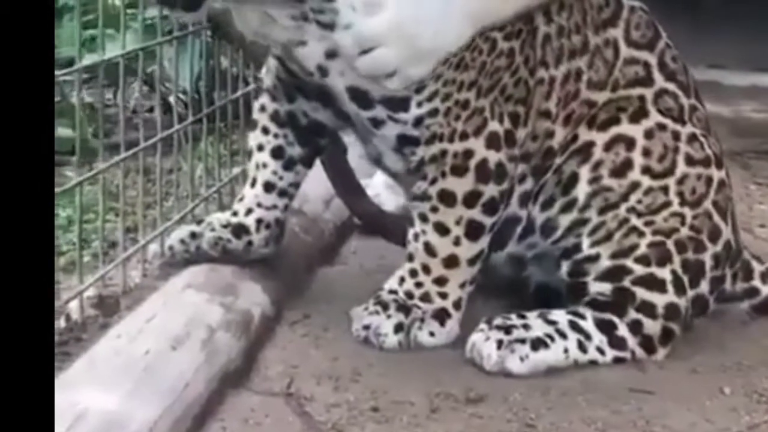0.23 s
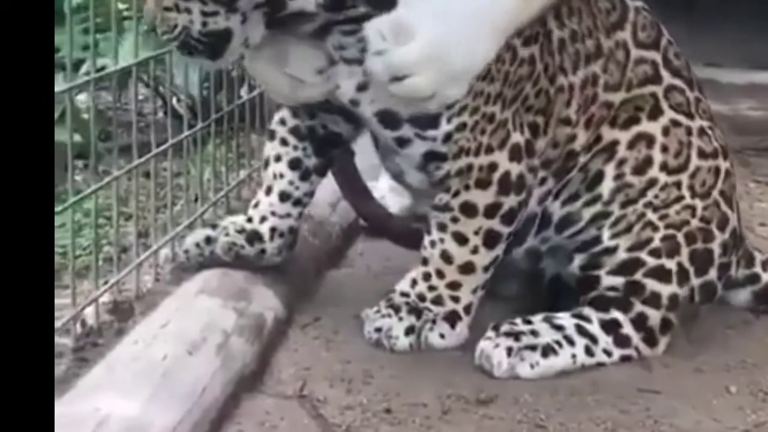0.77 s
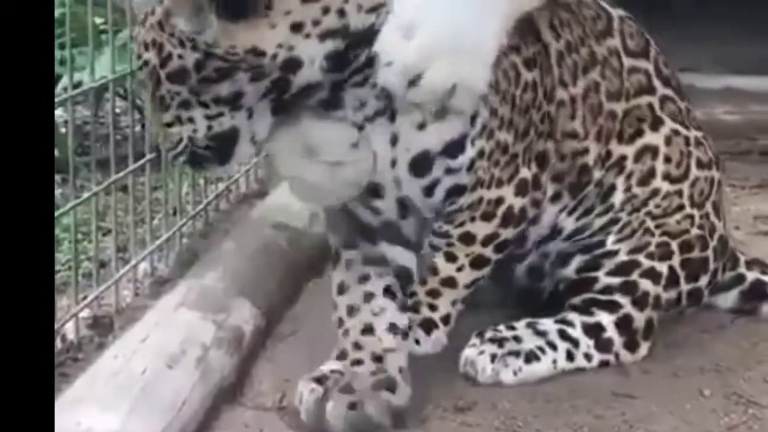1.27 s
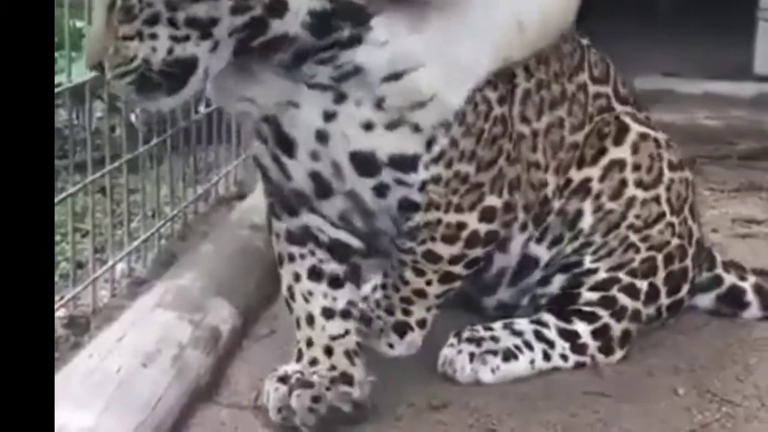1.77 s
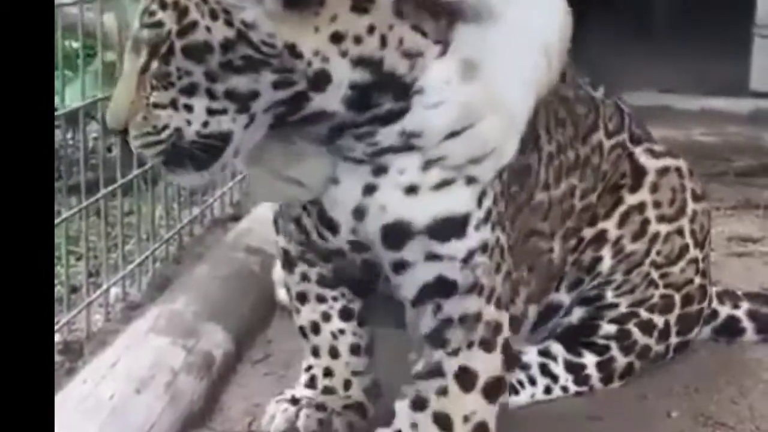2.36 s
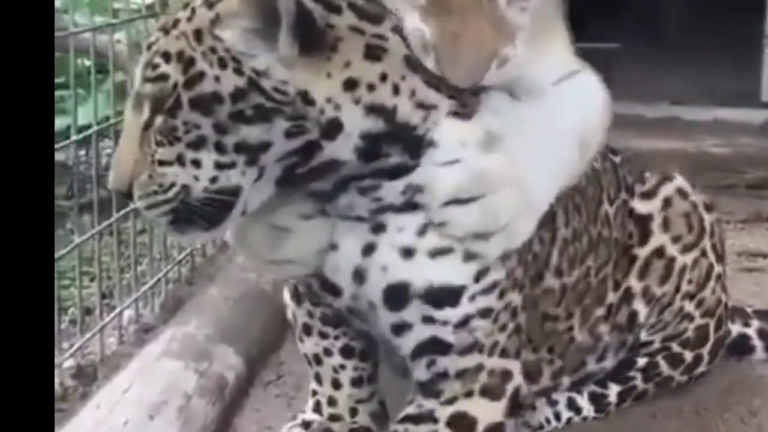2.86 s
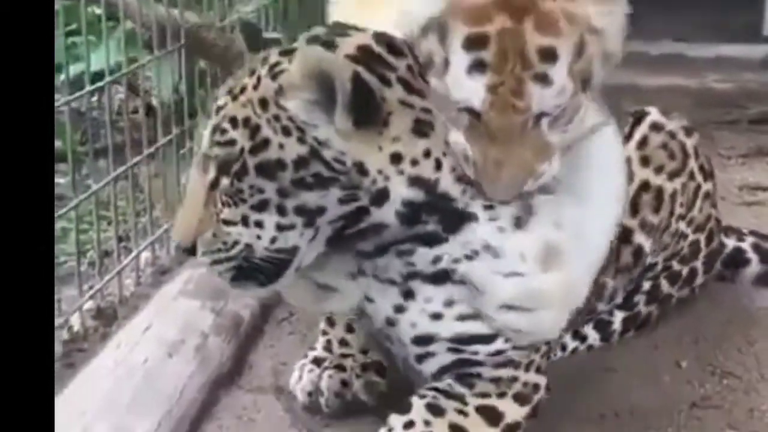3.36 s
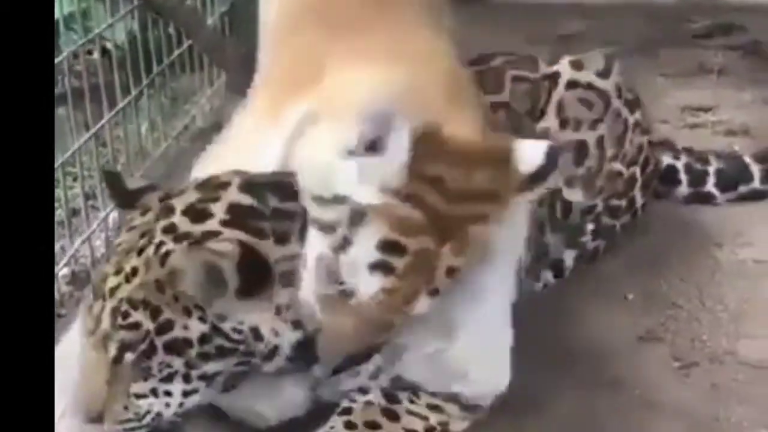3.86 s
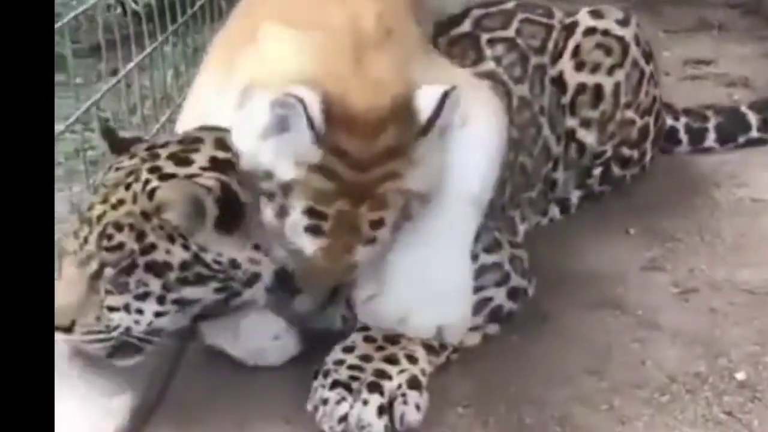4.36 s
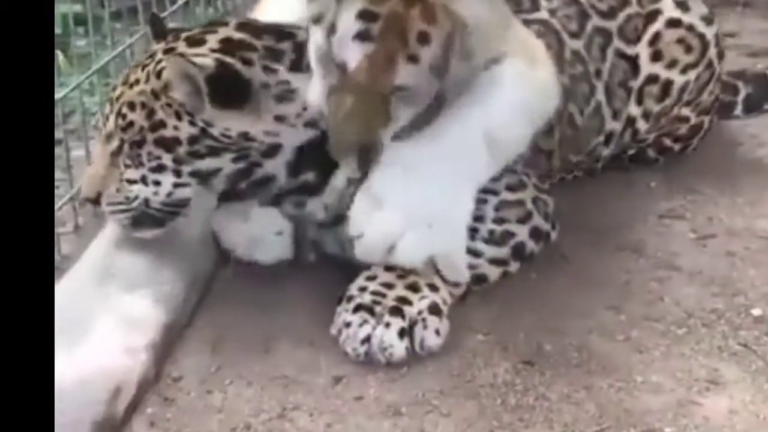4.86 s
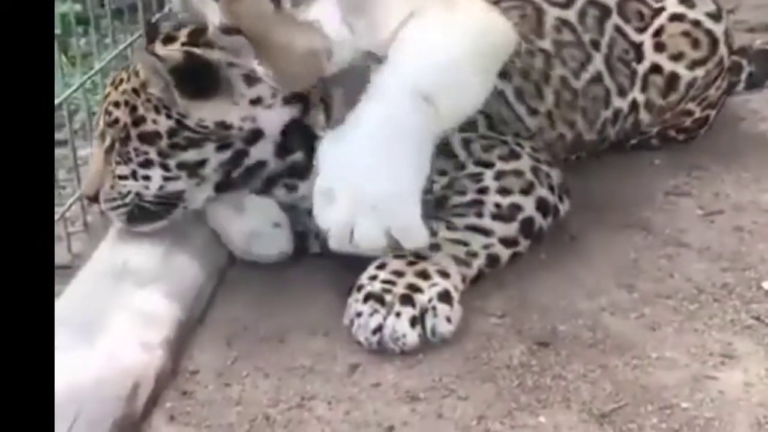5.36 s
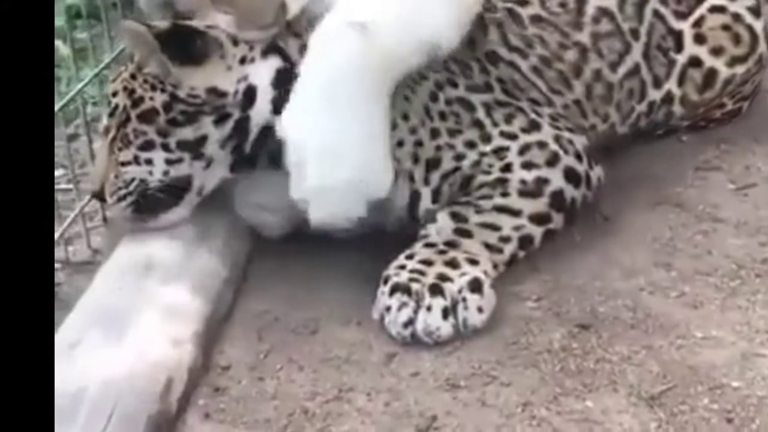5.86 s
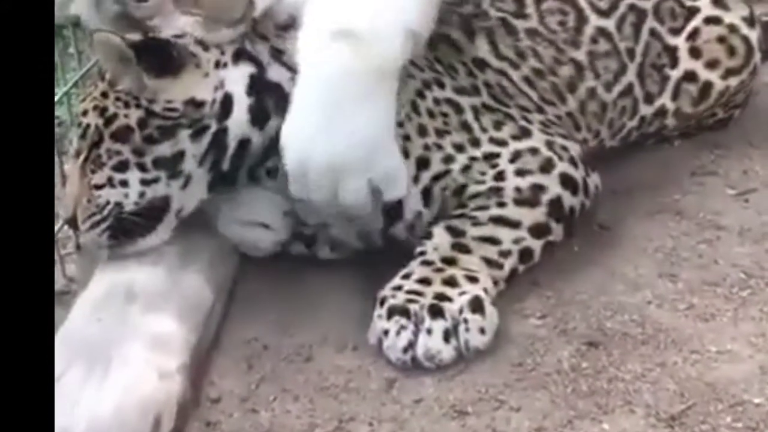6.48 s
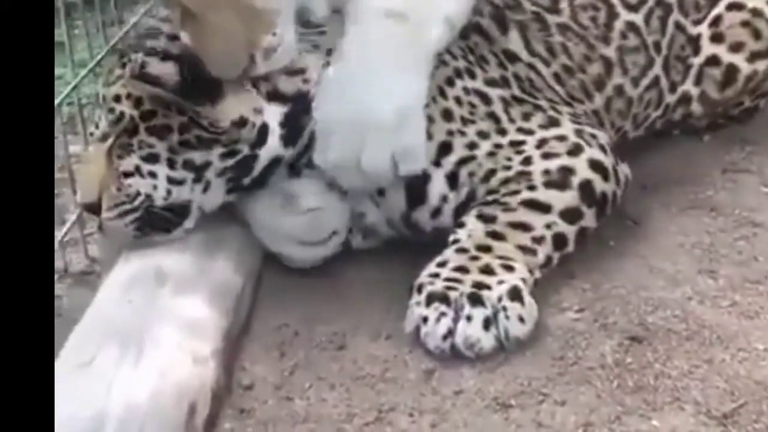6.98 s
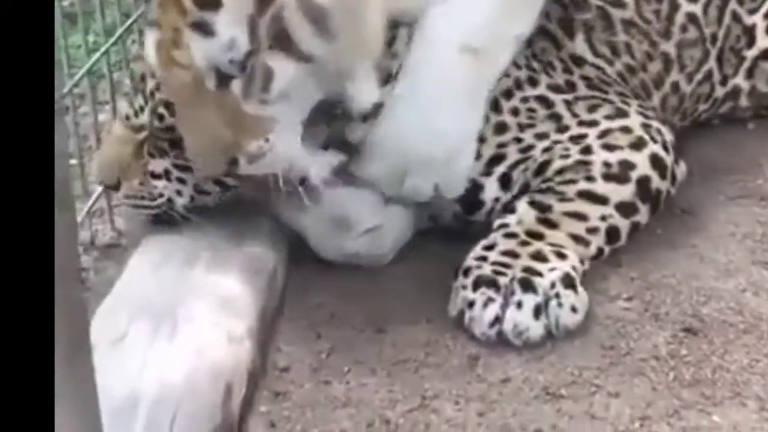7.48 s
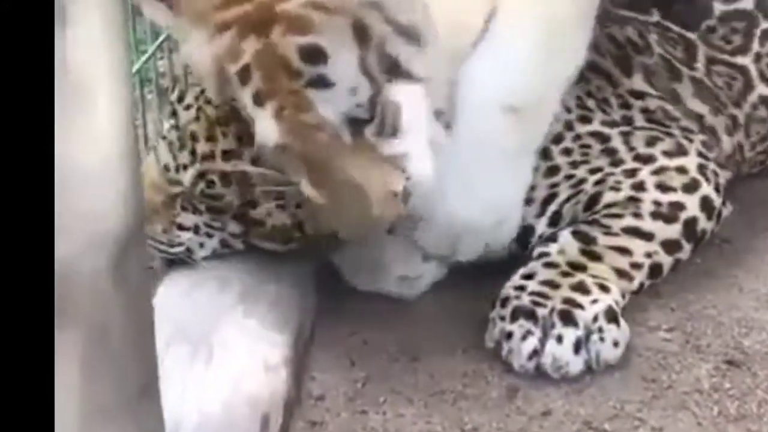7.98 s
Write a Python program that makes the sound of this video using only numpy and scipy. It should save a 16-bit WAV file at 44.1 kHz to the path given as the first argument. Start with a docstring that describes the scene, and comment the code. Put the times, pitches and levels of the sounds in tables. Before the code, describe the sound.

A big cat gives a harsh open-mouthed snarl that sputters out, then grunts, rumbles and growls long and rattling, over faint birds and hum.

```python
"""Far birds chirp, a machine hums and outdoor air hisses throughout, while two big cats wrestle in a concrete pen.
One gives a harsh open-mouthed snarl that sputters out in pops over a hiss of spent air. Paws then scuff the
gritty floor, and a grunt sinks to a closed-mouth rumble that opens into a long rattling growl over a faint rustle.
Voices are uneven beats of slack folds, with thumps and turbulent puffs, ringing in a changing throat; birds are
falling sine whistles, hum is sines, air, grit and rustle are shaped noise, and the pen adds dense echoes."""
import sys
import numpy as np
from scipy import signal
from scipy.fft import rfft, irfft
from scipy.io import wavfile

SR = 44100
rng = np.random.default_rng(int(sys.argv[2]) if len(sys.argv) > 2 else 0)


def digitize_waveform(pressure):
    """Quantize a signal to 16-bit integers and store it at the path in sys.argv[1].

    Rows of a 2-D input are taken as channels; values are limited to [-1, 1].
    """
    field = np.atleast_2d(pressure).T
    bounded = np.clip(field, -1, 1)
    quanta = np.round(bounded * 32767).astype(np.int16)
    wavfile.write(sys.argv[1], SR, quanta)


N = 362502
TIME = np.arange(N) / SR

# Separate pops as the snarl gives out. Each row: start in seconds, level in dB before the balance of the ranges.
POPS = [(2.15, -20.5), (2.162, -21.5), (2.188, -25.5), (2.221, -26.5), (2.258, -30.5), (2.278, -29),
        (2.315, -29.5), (2.349, -28), (2.398, -30), (2.448, -27.5), (2.486, -28), (2.54, -29), (2.58, -33),
        (2.634, -44)]
# Usual upper edges of the chest, throat and mouth ranges; teeth lie above. Three values in Hz.
CROSSOVERS_HZ = (470, 1150, 3000)


def cat():
    """Snarl, sputter with its exhaled hiss, grunt, rumble and long growl, all from one kind of voice."""
    out = sputter()
    for utterance in (snarl, exhale, grunt, rumble, growl):
        add(out, *utterance())
    return out


def snarl(focus_width_hz=110, unfocused=0.29, whistle_db=0.0, whistle_width_hz=260):
    """A quick swell and a hard push that settles to a hold; the resonances of mouth and teeth slide."""
    # Throat resonances. Each row: pitch in Hz, width in Hz, relative dB at the start, relative dB at the end.
    modes = [(113, 15, -3, -7), (171, 30, 2.5, 8), (312.6, 40, 1.5, 7), (334, 57, 4, -21),
             (687, 60, 7.5, 6.5), (1025, 59, 10, -3.5), (1268, 92, 3.5, -10.5), (1530, 720, -21.5, -18.5),
             (2802, 126, -16, -29.5), (3650, 420, -27, -28), (4130, 300, -24.5, -30),
             (4810, 80, -21.5, -29), (5610, 390, -29, -28.5), (7530, 1330, -34, -36),
             (8610, 250, -33.5, -29.5), (10160, 560, -45.5, -45)]
    # Uneven level of three ranges. Each row: time in seconds, throat, mouth and teeth in dB before smoothing.
    range_levels = [(0.62, -27, -36, -29), (0.636, -27.5, -25.5, -31), (0.702, -22.5, -29, -30),
                    (0.75, -25.5, -30, -29.5), (0.85, -27, -31, -30.5), (0.96, -29, -29, -33),
                    (1.034, -34, -28.5, -38.5), (1.118, -29, -28, -35.5), (1.238, -44.5, -25, -36),
                    (1.338, -29.5, -22, -34), (1.4, -32, -32, -42.5), (1.408, -33, -23, -29),
                    (1.458, -20, -26.5, -42), (1.47, -49, -31, -39), (1.512, -27, -22.5, -31.5),
                    (1.586, -34, -26.5, -41.5), (1.656, -31, -14.5, -30.5), (1.664, -46, -34, -46),
                    (1.706, -35, -25, -32.5), (1.744, -25.5, -27, -38), (2.104, -24.5, -31.5, -35.5),
                    (2.11, -21.5, -36, -36)]
    # The working jaw slides the main mouth resonance. Each row: time in seconds, pitch in Hz.
    mouth_curve = [(0.62, 1060), (0.796, 1142), (0.888, 1060), (0.936, 1240), (1.164, 1050), (1.248, 1250),
                   (1.298, 1134), (1.58, 1061), (1.602, 1150), (1.872, 1140), (1.926, 1030), (1.982, 1240),
                   (2.078, 1230), (2.135, 1060)]
    # Air whistles past the teeth, shifting with the lips. Each row: time in seconds, pitch in Hz.
    whistle_curve = [(0.62, 2880), (0.7, 2960), (0.755, 4900), (0.8, 4330), (0.828, 3050), (0.86, 3050),
                     (0.905, 4300), (0.945, 2760), (1.01, 4100), (1.28, 4130), (1.45, 4750), (1.62, 4760),
                     (1.85, 5450), (2.135, 3860)]
    # Upper edges of the chest, throat and mouth ranges. Three values in Hz.
    snarl_crossovers_hz = (470, 880, 1700)
    start_s, end_s = 0.6, 2.138
    held_db, push_db, push_s = -21.5, 3.5, 0.22  # held effort; extra push and the time in which it is spent
    swell_from_db, swell_s = -13.5, 0.028

    age = np.arange(0, end_s - start_s, 1 / SR)
    t = start_s + age
    swell_db = swell_from_db * np.maximum(1 - age / swell_s, 0)
    effort_db = held_db + push_db * np.exp(-age / push_s) + swell_db
    slaps, gains = flap(t, effort_db, rate_per_push=270, jitter=0.1385, force_db=0.3, colour_db=1.0)
    breath = np.interp(age, [0, age[-1]], [0.62, 0.17])
    drives = gains * excite(slaps, rough=0.4, breath=breath, burst_s=0.0024, tail=0.29, snap=0.42,
                            first_thump=0.064, mid_thump=0.072, dull_puff=0.14)
    chest, gullet, mouth, teeth = ring(drives, modes, leak_db=-3.5, jaw_start=1.011, jaw_end=0.99,
                                       waver_db=4.0, wander=0.018, crossovers=snarl_crossovers_hz)

    mouth_hz = np.interp(t, *np.transpose(mouth_curve))
    mouth = unfocused * mouth + resonate(mouth, mouth_hz, focus_width_hz)
    whistle_hz = np.interp(t, *np.transpose(whistle_curve))
    teeth = teeth + amp(whistle_db) * resonate(teeth, whistle_hz, whistle_width_hz)

    s, *levels_db = np.transpose(range_levels)
    smoothed_db = [smooth(np.interp(TIME, s, db), .05) for db in levels_db]
    upper_db = [np.interp(t, TIME, db) + swell_db for db in smoothed_db]
    return utter(t, [chest, gullet, mouth, teeth], [effort_db] + upper_db)


def sputter(chest_db=-2.0, throat_db=-2, mouth_db=-11.0, hiss_db=-28):
    """The last air of the snarl escapes in separate pops, each duller than the one before."""
    # Throat resonances. Each row: pitch in Hz, width in Hz, relative dB at the first pop, relative dB at the last.
    modes = [(185, 47, -2.5, 8), (346, 65, -10, 4.5), (673, 52, 0, 4), (820, 110, -5.5, -6),
             (1060, 62, -12, -4), (1446, 110, -34, -19), (1980, 137, -34, -25.5), (2590, 100, -31, -31),
             (3020, 220, -35.5, -27.5), (3550, 63, -25, -27), (4930, 530, -34, -40),
             (8850, 1700, -40.5, -41), (9850, 390, -42, -49)]
    first_bright_db, dull_s = 5, 0.11  # extra brightness of the first pop, and its fading time as the mouth closes
    out = np.zeros(N)
    slap = np.zeros(SR // 8)
    slap[SR // 50] = 1  # one beat, with room ahead of it for the parting of the folds
    first_s, last_s = POPS[0][0], POPS[-1][0]
    for s, db in POPS:
        progress = (s - first_s) / (last_s - first_s)
        bright_db = first_bright_db * np.exp((first_s - s) / dull_s)
        drives = excite(slap, rough=0.28, breath=0, burst_s=0.0031, tail=0.077, snap=0.34,
                        first_thump=0.25, mid_thump=0.18, dull_puff=0.56)
        posture = throat(modes, leak_db=-17.0, progress=progress)
        parts = signal.fftconvolve(drives, posture, axes=1)
        parts = parts / np.linalg.norm(parts, axis=1)[:, None] * np.sqrt(SR / 30)  # equal energy in each range
        balance_db = [chest_db - bright_db, throat_db, mouth_db + bright_db, hiss_db + bright_db]
        add(out, s - .021, amp(db + np.array(balance_db)) @ parts)
    return out


def exhale(first_db=-50, last_db=-57):
    """Spent air hisses past the teeth as fading shaped noise for as long as the sputter lasts."""
    # Colour of the hiss. Each row: pitch in Hz, relative level in dB per Hz.
    colour = [(300, -14), (1200, 3), (1800, -12), (2900, -7), (3300, -10), (3570, 7), (3850, -6),
              (4900, -6), (6300, -22), (8200, -20), (15000, -36)]
    t = np.arange(POPS[0][0], POPS[-1][0], 1 / SR)
    fade = amp(np.linspace(first_db, last_db, len(t)))
    return t[0], noise(colour)[:len(t)] * fade * signal.windows.tukey(len(t), .15)


def grunt():
    """A sudden deep grunt of thick, throaty beats that bursts out and sinks."""
    # Each row: time in seconds, effort in dB, mouth opening from 0 to 1.
    curve = [(3.912, -16, 0.73), (4.02, -17.5, 0.94), (4.07, -17.5, 0.75), (4.14, -17, 0.55),
             (4.22, -26, 0.87), (4.36, -28, 1), (4.46, -33, 0.55)]
    # Throat resonances. Each row: pitch in Hz, width in Hz, relative dB at the start, relative dB at the end.
    modes = [(130, 49, -6, -0.5), (180, 38, 4, 0.5), (356, 30, -14.5, -10), (662, 35, -9.5, -7),
             (800, 170, -23, -16), (1014, 78, -12, -8), (1470, 110, -16, -25), (1780, 300, -21, -30),
             (2500, 200, -25, -34), (3900, 540, -34, -31), (7800, 1700, -38, -40)]
    # Chest, throat, mouth and teeth against the effort. Each row: dB at the narrowest mouth, dB at the widest.
    ranges = [(-3.5, 0), (-28, -7), (-43, -21.5), (-48, -33.5)]
    t, effort_db, opening = gesture(curve)
    slaps, gains = flap(t, effort_db, rate_per_push=150, jitter=0.151, force_db=-0.5, colour_db=4.5)
    drives = gains * excite(slaps, rough=0.3, breath=0.26, burst_s=0.0029, tail=0.19, snap=0.31,
                            first_thump=0.25, mid_thump=0.3, dull_puff=0.35)
    parts = ring(drives, modes, leak_db=-11, jaw_start=0.98, jaw_end=0.96, waver_db=4.0)
    return utter(t, parts, opened(effort_db, opening, ranges))


def rumble():
    """A soft, full flutter behind closed lips that idles and builds, with thumps as the folds part and close."""
    # Each row: time in seconds, effort in dB, mouth opening from 0 to 1.
    curve = [(4.43, -32, 0.6), (4.54, -35.5, 0.8), (4.7, -36.5, 0.5), (4.82, -34.5, 0.2),
             (4.97, -27.5, 0.9), (5.12, -22, 0.5), (5.3, -24, 0), (5.42, -20, 0.24), (5.525, -20, 0.85)]
    # Throat resonances. Each row: pitch in Hz, width in Hz, relative dB at the start, relative dB at the end.
    modes = [(62.5, 22, 0, -8), (114, 75, -4, -0.5), (187.6, 35, 1, 2.5), (367, 56, -20.5, -14),
             (642, 56, -16, -20), (860, 130, -26, -25.5), (1346, 35, -34, -20), (1640, 400, -45, -36),
             (2640, 160, -30, -38), (3365, 350, -42, -34), (7600, 2100, -50, -51)]
    # Chest, throat, mouth and teeth against the effort. Each row: dB at the narrowest mouth, dB at the widest.
    ranges = [(-1.5, -0.5), (-27, -12), (-36, -29.5), (-50, -37)]
    t, effort_db, opening = gesture(curve)
    slaps, gains = flap(t, effort_db, rate_per_push=58, jitter=0.219, force_db=2.5, colour_db=3.0,
                        limp=0.497, slack_rate=29)
    drives = gains * excite(slaps, rough=0.31, breath=0.16, burst_s=0.0023, tail=0.089, snap=0.35,
                            first_thump=0.35, mid_thump=0.21, dull_puff=0.61)
    parts = ring(drives, modes, leak_db=-7.5, jaw_start=1.0, jaw_end=0.95, waver_db=4.0)
    return utter(t, parts, opened(effort_db, opening, ranges))


def growl():
    """A long rattle of separate beats, each with its own force and colour, and a rasp between them."""
    # Each row: time in seconds, effort in dB, mouth opening from 0 to 1.
    curve = [(5.51, -22, 0.43), (5.64, -20.5, 0.75), (5.78, -20.5, 0.84), (6.0, -19, 0.87),
             (6.55, -22, 0.97), (6.85, -21, 0.92), (7.1, -25, 1), (7.4, -21.5, 0.69), (7.52, -20, 0.88),
             (8.22, -22.5, 1)]
    # Throat resonances. Each row: pitch in Hz, width in Hz, relative dB at the start, relative dB at the end.
    modes = [(59.4, 10.2, -8.5, -8), (115.7, 76, -6, -8.5), (211.7, 23.2, -3.5, -2.5),
             (331, 108, -13.5, -15), (385.5, 39, -26.5, -13), (633, 33.5, -10.5, -14), (786, 180, -15, -19),
             (1025, 54, -12, -11.5), (1327, 44, -15, -18), (1636, 190, -18.5, -10.5),
             (2390, 220, -35, -30.5), (3746, 162, -33.5, -24.5), (4220, 164, -29, -41),
             (5320, 340, -45.5, -39.5), (8100, 770, -50, -47)]
    # Chest, throat, mouth and teeth against the effort. Each row: dB at the narrowest mouth, dB at the widest.
    ranges = [(0, 0), (-34, -4.5), (-36, -14.5), (-44, -28)]
    t, effort_db, opening = gesture(curve)
    slaps, gains = flap(t, effort_db, rate_per_push=98, jitter=.15, force_db=1.5, colour_db=2.5, limp=0.398)
    drives = gains * excite(slaps, rough=0.21, breath=0.081, burst_s=0.0021, tail=0.026, snap=0.45,
                            first_thump=0.42, mid_thump=0.51, dull_puff=0.25)
    parts = ring(drives, modes, leak_db=-13.0, jaw_start=0.99, jaw_end=0.99, waver_db=3.5, wander=0.025)
    return utter(t, parts, opened(effort_db, opening, ranges))


def gesture(curve):
    """Times, effort and mouth opening along a curve."""
    s, effort_db, opening = np.transpose(curve)
    t = np.arange(s[0], s[-1], 1 / SR)
    return t, np.interp(t, s, effort_db), np.interp(t, s, np.clip(opening, 0, 1))


def flap(t, effort_db, rate_per_push, jitter, force_db, colour_db, limp=0, slack_rate=23):
    """Slack folds flap unevenly, faster with effort: their beats, and each beat's gain in the four ranges."""
    # Many of the beats are placed, mostly the stronger ones; the rest fall between by chance.
    # Each row: time in seconds, extra force in dB, extra brightness in dB, both before the force shares.
    placed_rows = [(0.636, 0, 0.5), (0.713, 0.5, 1.5), (0.757, 1.5, 2), (0.883, 2, -2), (0.904, 0, -1.5),
                   (1.122, 1.5, 0), (1.228, 1, 2), (1.249, 1, 2.5), (1.303, 2, -2.5), (1.332, 1, -1),
                   (1.45, 2.5, 1), (1.519, 3.5, -2.5), (1.629, 3.5, 0), (1.652, 1, -1), (1.863, 1, -1),
                   (1.91, -1, 1.5), (2.028, -2.5, 1.5), (2.074, 1, 3), (2.097, 2, 4), (2.123, 3, 4),
                   (3.92, 4, -5.5), (3.952, 2.5, 0.5), (3.997, 7.5, -3), (4.022, 4.5, 0), (4.039, -2, 4),
                   (4.106, 3, -3), (4.182, 7.5, -1), (4.239, -1, 0), (4.323, 5, -8), (4.975, 5, -5),
                   (5.065, 6, -3), (5.114, 9, -2), (5.404, 5, -4), (5.506, 9, -4), (5.539, 8, -2),
                   (5.758, 6, 1), (5.883, 1.5, -1), (5.902, 4, -2.5), (5.934, 3, -6), (5.968, 1, -1),
                   (6.053, 1, 3), (6.065, 4, -4), (6.114, 0.5, 2), (6.24, 2, 2), (6.274, 6, 3),
                   (6.316, 11.5, 0), (6.364, 9, -2.5), (6.492, 8, -4), (6.603, 11.5, -5), (6.694, 6, 2),
                   (6.746, 2.5, 3), (6.81, 6, -6), (6.833, 6.5, -6), (6.871, 2.5, 4), (7.025, 11, -1),
                   (7.073, 5.5, -4), (7.164, 1, -4), (7.221, 1.5, 0), (7.292, 1, 1), (7.477, 3, 2),
                   (7.597, 8.5, -1), (7.687, 9, -7), (7.771, 3.5, 0), (7.824, 1.5, 3), (7.857, 6, -4),
                   (7.891, 7, -4), (7.979, 6, 2), (8.067, 6.5, 3), (8.101, 13, -7), (8.19, 1.5, 3)]
    # How much each range feels the force of a beat. Four shares: chest, throat, mouth, teeth.
    force_shares = (0.25, 0.8, 1.0, 1.15)
    build_up = 0.35  # pressure builds behind shut folds: strength grows as this power of the wait

    turns = np.cumsum(slack_rate + rate_per_push * amp(effort_db)) / SR  # slack_rate in beats per second
    placed_s, placed_db, bright_db = np.transpose([row for row in placed_rows if t[0] < row[0] < t[-1]])
    marks = np.interp([t[0], *placed_s, t[-1]], t, turns)
    whole_beats = np.maximum(np.round(np.diff(marks)), 1)  # from one placed beat to the next
    counts = np.cumsum([0, *whole_beats]).astype(int)
    beats, placed = np.arange(1, counts[-1]), counts[1:-1] - 1

    chance = np.clip(rng.standard_normal((200, 6))[:len(beats)], -1.8, 1.8)
    # a late, strong beat pulls an early, weak one after it
    chance[:, :2] += limp * np.where(beats % 2, 1, -1)[:, None]
    chance[placed] = 0
    late, force, *colour = chance.T
    beat_turns = np.interp(beats + jitter * late, counts, marks)
    at = np.sort(np.interp(beat_turns, turns, t))

    beat_db = force_db * force + colour_db * np.array(colour)
    beat_db[:, placed] = [placed_db, placed_db, placed_db + bright_db, placed_db + bright_db]
    wait = np.clip(1 + jitter * np.diff(late, prepend=0), .2, 2)
    slaps = np.zeros(len(t))
    slaps[np.searchsorted(t[:-1], at)] = wait ** build_up
    gains = [amp(np.interp(t, at, share * db)) for share, db in zip(force_shares, beat_db)]
    return slaps, np.array(gains)


def excite(slaps, rough, breath, burst_s, tail, snap, first_thump, mid_thump, lead_s=0.00714,
           first_puff=0.1, dull_puff=0.3, close_s=0.003, tail_s=0.03):
    """Each beat: thump and dull puff as the folds part, a push and snapping turbulence, a thump as they close."""
    reach = round(SR / 30)
    t = np.arange(-reach, reach + 1) / SR
    air = rng.standard_normal(len(slaps))

    def bell(at, width):
        """A bell-shaped pulse around a time, both in seconds."""
        return np.exp(-.5 * ((t - at) / width) ** 2)

    def turbulence(lead):
        """Noise gated by the flow of each beat, over steady breath."""
        flow = bell(0, burst_s) + lead * bell(-lead_s, burst_s / 2) + tail * (t > 0) * np.exp(-abs(t) / tail_s)
        gate = np.sqrt(abs(signal.fftconvolve(slaps ** 2, flow ** 2, "same")))
        return evened((evened(gate) + breath) * air)

    dull = turbulence(dull_puff)
    puffs = turbulence(first_puff)
    knock = first_thump * bell(-lead_s, 0.00037) + mid_thump * bell(-0.00036, 0.00031) + bell(close_s, 0.00044)
    thumps = evened(signal.fftconvolve(slaps, knock, "same"))
    crack = snap * evened(slaps)
    # thumps hold only bass, so a little of them outweighs the wide puffs there
    chest = thumps * (1 - rough) / 5 + rough * dull
    return np.array([chest, crack + dull, crack + puffs, puffs])


def throat(modes, leak_db, progress, jaw=1, crossovers=CROSSOVERS_HZ, wander=0.014, waver_db=2.0):
    """Causal rings of the vocal tract in its four ranges; tongue and jaw never sit quite the same twice."""
    # Broad leak between the resonances. Each row: pitch in Hz, level in dB before leak_db is added.
    leak = [(20, -43), (60, -28), (200, -34), (500, -9), (1200, -49), (2000, -31.5), (6000, -54),
            (9500, -44), (13000, -44.5), (15000, -51)]
    hz = np.fft.rfftfreq(8192, 1 / SR)
    power = amp(read(leak, hz) + leak_db) ** 2
    for (f, width, first_db, last_db), (shift, swell) in zip(modes, rng.standard_normal((len(modes), 2))):
        db = first_db + (last_db - first_db) * progress
        if f > crossovers[0]:  # the chest stays put, the mouth moves
            f = f * jaw * (1 + wander * shift)
            db = db + waver_db * swell
        power = power + amp(db) ** 2 / (1 + ((hz - f) / width) ** 2) ** 2
    power = power * hz ** 4 / (hz ** 4 + 38 ** 4)  # the deepest bass radiates poorly

    below = [0 * hz] + [1 / (1 + (hz / f) ** 12) for f in crossovers] + [np.ones(len(hz))]
    log_gain = .5 * np.log(power * abs(np.diff(below, axis=0)) + 1e-12)
    cepstrum = irfft(log_gain)[:, :len(hz) - 1]
    cepstrum[:, 1:] *= 2  # folded forward in time, so nothing rings before its blow
    return irfft(np.exp(rfft(cepstrum, 8192)))[:, :4096]


def ring(drives, modes, leak_db, jaw_start, jaw_end, waver_db, wander=0.013, crossovers=CROSSOVERS_HZ):
    """One posture of the throat fades into the next, while the jaw slides the middle and upper resonances."""
    hop, size = 2048, drives.shape[1]
    padded = np.pad(drives, ((0, 0), (hop, 5 * hop)))
    parts = np.zeros(padded.shape)
    for i in range(0, size + hop, hop):
        piece = padded[:, i:i + 2 * hop] * np.hanning(2 * hop)
        progress = min(i / size, 1)
        jaw = jaw_start + (jaw_end - jaw_start) * progress
        posture = throat(modes, leak_db, progress, jaw, crossovers, wander, waver_db)
        rung = signal.fftconvolve(piece, posture, axes=1)
        parts[:, i:i + rung.shape[1]] += rung
    return parts[:, hop:hop + size]


def resonate(x, hz, width):
    """A resonance of gain 1 that follows the curve hz."""
    turn = np.exp(2j * np.pi * np.cumsum(hz) / SR)
    r = np.exp(-np.pi * width / SR)
    # shifted down to zero pitch, smoothed there, and shifted back
    return 2 * (turn * signal.lfilter([1 - r], [1, -r], x / turn)).real


def opened(effort_db, opening, ranges):
    """Levels of the four ranges for an effort and a mouth opening."""
    return [effort_db + narrow_db + (wide_db - narrow_db) * opening for narrow_db, wide_db in ranges]


def steadied(x):
    """Holds the slow level at rms 1 and leaves the beats alone."""
    power = smooth(x ** 2, .15) / smooth(np.ones(len(x)), .15)
    return x / np.sqrt(abs(power) + 1e-20)


def utter(t, parts, levels_db):
    """Sums the four ranges at their levels: start time and sound."""
    voice = sum(steadied(part) * amp(db) for part, db in zip(parts, levels_db))
    return t[0], voice * signal.windows.tukey(len(t), 0.017 / (t[-1] - t[0]))


def paws():
    """Grit crunches under a sliding paw, and faint airy rustle runs beneath the growl: strokes of flickering noise."""
    # Short scuffs and long rustles. Each row: start in seconds, length in seconds, rms level in dB before the fades.
    scuffs = [(3.037, 0.11, -64.5), (3.609, 0.2, -56), (3.662, 0.0065, -67), (4.717, 0.26, -57),
              (5.032, 1, -56.5), (5.372, 0.021, -48), (5.72, 1, -57.5), (6.74, 0.35, -55.5)]
    out = np.zeros(N)
    # pitch in Hz, relative level in dB per Hz
    colour = [(150, -10.0), (1200, 9.5), (2500, 2.0), (5000, -1.5), (8000, -7.0), (12800, -11.0), (15200, -22.0)]
    grit = noise(colour) * amp(3.5 * drift(260))
    for s, length, db in scuffs:
        stroke = grit[round(s * SR):][:round(length * SR)]
        add(out, s, amp(db) * evened(stroke) * signal.windows.tukey(len(stroke), .5))
    return out


def birds():
    """Nearer chirps with their echo, over a flock that is heard as echo only."""
    # The nearer calls of distant birds. Each row: start in seconds, pitch in Hz, level in dB before the final mix.
    calls = [(0.076, 4500, -56.5), (0.14, 3600, -58.5), (0.23, 4140, -61), (0.551, 4080, -61),
             (2.641, 3780, -60.5), (2.72, 4060, -66), (2.971, 3810, -67), (3.045, 4700, -69),
             (3.07, 3520, -68.5), (3.14, 4700, -65), (3.21, 3250, -64), (3.34, 4400, -76),
             (3.41, 3600, -66.5), (3.43, 4800, -69), (3.479, 3650, -71), (3.74, 3760, -61.5),
             (3.886, 4400, -57), (4.261, 5300, -68), (4.291, 3780, -63), (4.759, 3800, -65),
             (5.385, 4410, -56), (5.421, 3540, -57)]
    flock_per_s, low_hz, high_hz = 24, 3247, 4910
    flock_db, spread_db = -64.5, 8.5  # before the echo gain
    near, far = np.zeros((2, N))
    for s, pitch_hz, db in calls:
        add(near, s, amp(db) * chirp(pitch_hz))
    for k, (when, pitch, size) in enumerate(rng.random((round(flock_per_s * N / SR), 3))):
        call = chirp(low_hz + (high_hz - low_hz) * pitch, blur_hz=379)
        add(far, (k + when) / flock_per_s, amp(flock_db + spread_db * (2 * size - 1.5)) * call)
    return amp(1.5) * near + amp(4.0) * pen(near, 1.26) + pen(far, 1.16)


def chirp(pitch_hz, blur_hz=230):
    """A fuzzy whistle, rms 1: a sine slides down while chance blurs its pitch."""
    length_s, fall = 0.08, 0.1207  # fall as a share of the pitch
    t = np.arange(0, length_s, 1 / SR)
    hz = pitch_hz * (1 + fall * (.5 - t / length_s)) + blur_hz * drift(701, len(t))
    return evened(np.sin(2 * np.pi * np.cumsum(hz) / SR) * np.sin(np.pi * t / length_s) ** .5)


def yard():
    """Outdoor air as slowly drifting noise, and a machine hum of sines that waver in level and phase."""
    # Colour of the air. Each row: pitch in Hz, relative level in dB per Hz.
    air_colour = [(29, -37), (50, 0.5), (107, 0), (190, -2), (428, -8.5), (674, -15), (1110, -16.5),
                  (1790, -21), (2500, -24.5), (3580, -18.5), (6060, -29.5), (11800, -38.5), (15000, -47)]
    # Partials of the machine. Each row: pitch in Hz, mean level in dB before the hum's final trim.
    partials = [(80.7, -57), (123.8, -56.5), (183.0, -54.5), (204.6, -68), (242.2, -60.5)]
    hum = np.zeros(N)
    for hz, db in partials:
        level = amp(db + 2 * drift(17)) * np.sqrt(2)
        hum += level * np.sin(2 * np.pi * hz * TIME + 0.38 * drift(2.4))
    air_db = -53.5 + 0.27 * drift(3.7)
    return amp(-2) * hum + amp(air_db) * noise(air_colour)


def pen(x, stretch):
    """Dense echoes from concrete, each band dying at its own speed."""
    # Decay of the walls. Each row: pitch in Hz, time to fall 60 dB in seconds before stretch multiplies it.
    decay = [(100, 0.49), (250, 0.36), (1000, 0.047), (4000, 0.29), (12000, 0.31)]
    taps = np.zeros(SR)
    at = np.arange(200, SR - 20, 20)
    taps[at + rng.integers(0, 20, len(at))] = rng.choice([-1., 1.], len(at))
    hz, t, z = signal.stft(taps, SR, nperseg=256)
    t60 = stretch * read(decay, hz)[:, None]
    tail = signal.istft(z * amp(-60 * t / t60), SR, nperseg=256)[1]
    return signal.fftconvolve(x, tail / np.linalg.norm(tail))[:N]


def amp(db):
    """Decibels to gain."""
    return 10 ** (np.asarray(db) / 20)


def evened(x):
    """Scales to rms 1."""
    return x / np.sqrt(np.mean(x ** 2) + 1e-20)


def read(points, hz):
    """Reads a spectrum on a log-frequency axis."""
    f, value = np.transpose(points)
    return np.interp(np.log(hz + 1), np.log(f + 1), value)


def add(mix, s, sound):
    """Mixes a sound in at time s."""
    part = mix[max(round(s * SR), 0):][:len(sound)]
    part += sound[:len(part)]


def noise(points):
    """Steady noise of a given spectrum, rms 1."""
    gain = amp(read(points, np.fft.rfftfreq(N, 1 / SR)))
    return evened(irfft(rfft(rng.standard_normal(N)) * gain, N))


def drift(per_s, size=N):
    """Wandering chance of about unit size, with per_s new values a second."""
    return np.interp(TIME[:size] * per_s, np.arange(size), rng.standard_normal(size))


def smooth(x, seconds):
    """Moving average under a bell."""
    bell = signal.windows.hann(int(seconds * SR) | 1)
    return signal.fftconvolve(x, bell / bell.sum(), "same")


def scene():
    """The cats are near and almost dry; the mix below about 1200 Hz leans slightly right, with faint wide echoes."""
    near = cat() + paws()
    mono = near + amp(-7.0) * pen(near, 0.92) + birds() + yard()
    low = signal.sosfilt(signal.butter(2, 1200, fs=SR, output="sos"), mono)
    side = amp(-37) * low + amp(-36) * pen(low, 0.12) + amp(-74.0) * pen(mono, .3)
    return np.array([mono - side, mono + side])


def record(dry, ceiling=.43, edge_hz=15650):
    """The loudest beats are rounded off by overload; then the band limit."""
    rounded = dry / (1 + (dry / ceiling) ** 6) ** (1 / 6)
    lowpass = signal.firwin(511, edge_hz, window=("kaiser", 9), fs=SR)
    return signal.oaconvolve(rounded, lowpass[None], "same")


dry = scene()
out = record(dry)
digitize_waveform(out)
```